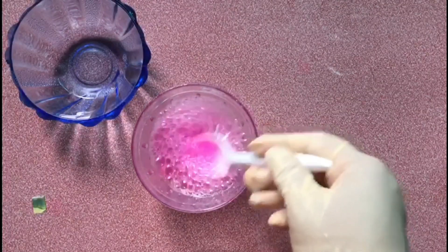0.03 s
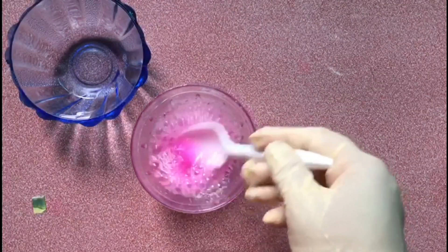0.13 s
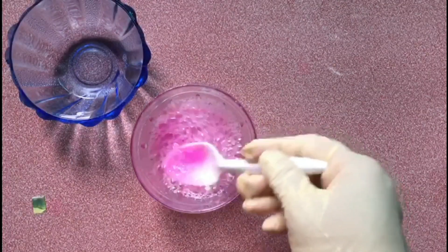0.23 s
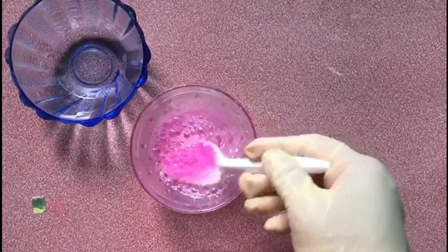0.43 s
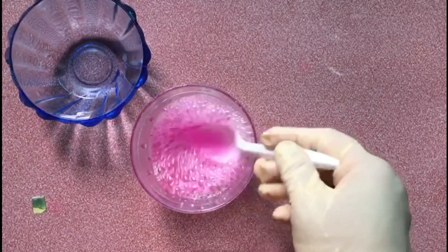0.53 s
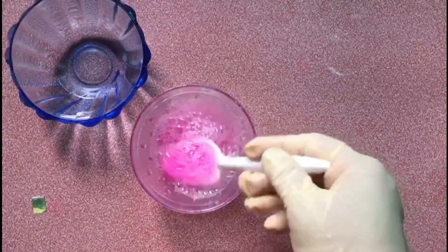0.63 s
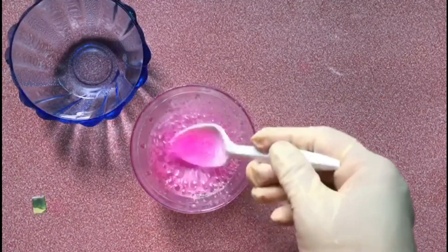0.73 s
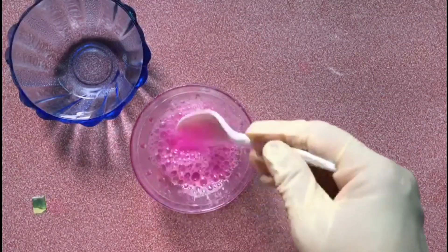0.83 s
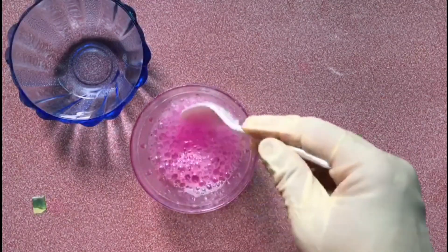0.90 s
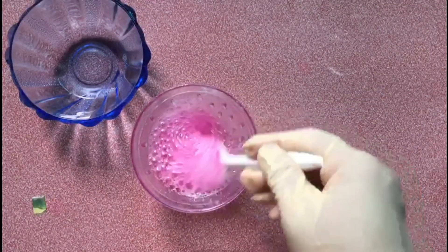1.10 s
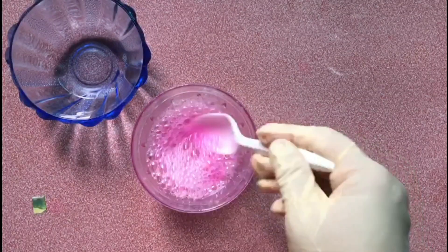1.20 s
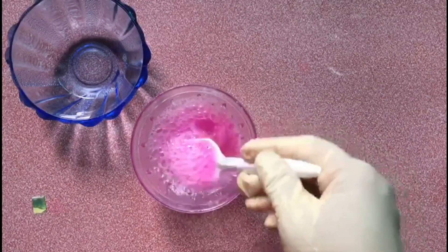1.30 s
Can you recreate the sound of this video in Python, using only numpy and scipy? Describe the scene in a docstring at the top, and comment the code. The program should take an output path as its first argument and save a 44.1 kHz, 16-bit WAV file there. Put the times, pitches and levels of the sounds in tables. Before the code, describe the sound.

A plastic spoon clacks against a small glass bowl while stirring foamy liquid, heard close in a quiet room with a faint hum. After light touches, it clacks at 0.2 seconds and hardest at 0.4, with soft table thumps. At 0.7 a tap rocks the bowl. At 1.1 another clack rings the glass briefly, followed by light ticks and faint swirling liquid.

```python
"""A quiet room, one microphone close to a small glass bowl on a table: a plastic spoon stirs foamy liquid.
From the start foam crackles over a low hum, and the spoon touches the bowl lightly. It clacks at 0.2 s
and hardest at 0.4 s, each push making the table boom. At 0.7 s a tap rocks the bowl and the glass rings
faintly. At 1.1 s a last clack rings the glass again; light ticks, blips and swirling liquid follow."""
import sys
import numpy as np
from scipy import signal
from scipy.fft import rfft, irfft
from scipy.io import wavfile

SR = 44100
rng = np.random.default_rng(int(sys.argv[2]) if len(sys.argv) > 2 else 0)


def wrap_up_sound(samples):
    """Save the sound to the file named by the first command line argument, as 16-bit audio."""
    columns = np.atleast_2d(samples).T
    # keep every value between -1 and 1, then stretch to whole-number steps
    tamed = np.clip(columns, -1, 1)
    steps = np.round(tamed * 32767).astype(np.int16)
    wavfile.write(sys.argv[1], SR, steps)


N = 59535
T = np.arange(N) / SR


def from_db(db):
    """Decibels to gain."""
    return 10 ** (np.asarray(db) / 20)


def unit_rms(x):
    """Scale to an rms of 1."""
    return x / np.sqrt(np.mean(x ** 2) + 1e-20)


def at_time(s, x):
    """Start a sound at s seconds."""
    return np.concatenate([np.zeros(max(int(s * SR), 0)), x])[:N]


def decay(t60):
    """Envelope that loses 60 dB in t60 seconds."""
    return np.exp(-np.log(1000) * T / t60)


def sine(hz):
    """A unit sine."""
    return np.sin(2 * np.pi * hz * T)


def damped(hz, swell_s):
    """A heavily damped mode that peaks at swell_s and dies quickly."""
    return sine(hz) * T / swell_s * np.exp(1 - T / swell_s)


def noise():
    """White noise."""
    return rng.standard_normal(N)


def coloured(x, spectrum):
    """Shape a signal by (frequency [Hz], gain [dB]) points, then scale to an rms of 1."""
    hz, db = np.transpose(spectrum)
    bin_hz = np.maximum(np.fft.rfftfreq(N, 1 / SR), 1)
    gain = from_db(np.interp(np.log(bin_hz), np.log(hz), db))
    return unit_rms(irfft(rfft(x) * gain, N))


def drift(hz):
    """A slow random wander below hz, with an rms of 1."""
    lowpass = signal.butter(2, hz, fs=SR, output="sos")
    return unit_rms(signal.sosfilt(lowpass, rng.standard_normal(2 * N))[N:])


# air of the quiet room: (frequency [Hz], relative level [dB])
AIR_COLOUR = [(25, -30), (55, -10), (120, 1.5), (300, -12), (700, -20), (1400, -22), (1800, -19.5),
              (2800, -23), (9000, -28), (12000, -35)]
# low hum in the room: (pitch [Hz], swell as points of (time [s], level [dB]))
HUM_TONES = [(56, [(0, -82), (0.3, -61), (0.68, -67.5), (0.79, -56), (0.92, -71), (1.1, -69), (1.28, -56)]),
             (103, [(0, -94), (0.35, -67.5), (0.65, -66), (0.85, -72.5), (1.0, -65), (1.3, -57.5)])]

def room_tone():
    """Faint hiss and two hum tones that swell and waver behind everything."""
    out = from_db(-66.5) * coloured(noise(), AIR_COLOUR)
    for hz, points in HUM_TONES:
        swell = from_db(np.interp(T, *np.transpose(points)))
        waver = 1 + 0.31 * (drift(hz=1.9) + 1j * drift(hz=7.1))   # in level and phase
        out += swell * np.real(waver * np.exp(2j * np.pi * hz * T))
    return out


# the room around the bowl: (band centre [Hz], level [dB], t60 [s])
ROOM_BANDS = [(150, -9.5, 0.39), (503.5, -5.5, 0.23), (1064, -9, 0.3), (1620, -9, .36), (2082, -15.5, 0.3),
              (3300, -11.5, 0.28), (5680, -15, 0.18), (11000, -13, 0.16)]

def reverberation(near, onset_s=0.00081, end_s=0.22):
    """The room returns a diffuse tail, each band with its own decay, cut short after end_s."""
    log_hz = np.log(np.maximum(np.fft.rfftfreq(N, 1 / SR), 1))
    log_centres = np.log([hz for hz, _, _ in ROOM_BANDS])
    window = (1 - np.exp(-T / onset_s)) * np.exp(-(T / end_s) ** 4)
    white = rfft(noise())
    tail = np.zeros(N)
    for selector, (_, db, t60) in zip(np.eye(len(ROOM_BANDS)), ROOM_BANDS):
        band = irfft(white * np.interp(log_hz, log_centres, selector), N)
        envelope = decay(t60) * window
        tail += from_db(db) * band * envelope / np.linalg.norm(envelope)
    return signal.fftconvolve(near, tail)[:N]


# foam on the liquid: (frequency [Hz], relative level [dB])
POP_COLOUR = [(300, -28.5), (1000, 14.5), (2000, -7), (3500, -3.5), (7000, -1), (12000, -46)]

def foam(pops_per_s=73, spread_db=3.5):
    """Tiny bubbles burst at random, barely audible even up close."""
    bursts = rng.random(N) < pops_per_s / SR
    strength = from_db(spread_db * np.minimum(rng.exponential(1, N), 4))
    polarity = rng.choice([-1, 1], N)
    return from_db(-83) * coloured(bursts * strength * polarity, POP_COLOUR)


# liquid swirling behind the spoon: (peak time [s], level [dB], half length [s])
STROKES = [(0.23, -60.5, .035), (0.813, -69.5, 0.047), (1.188, -58, 0.061), (1.344, -64.5, 0.037)]
# its wash: (frequency [Hz], relative level [dB])
WASH_COLOUR = [(120, -7), (270, 1.5), (520, -4), (850, -10), (1700, -6), (3000, -6.5), (6000, -15.5),
               (12000, -31.5)]

def swirls(grains_per_s=2800):
    """A soft, grainy wash swells and fades behind each stroke."""
    grains = (rng.random(N) < grains_per_s / SR) * noise()
    flow = sum(from_db(db) * np.exp(-((T - s) / half_s) ** 2) for s, db, half_s in STROKES)
    return flow * coloured(grains, WASH_COLOUR)


# short pitched blips at the bowl: (time [s], level [dB], pitch [Hz])
PITCHED_BLIPS = [(0.045, -55.5, 1840), (0.057, -45, 1860), (0.063, -46.5, 1860), (0.059, -61.5, 643),
                 (0.701, -49.5, 560), (1.132, -52.5, 395), (1.191, -66, 478), (1.308, -63.5, 964)]

def blips(swell_cycles=4):
    """Short damped tones: soft spoon taps at the start, a knock as the bowl rocks, a few liquid blips."""
    return sum(at_time(s, from_db(db) * damped(hz, swell_cycles / hz)) for s, db, hz in PITCHED_BLIPS)


# pushes on the table under the bowl:
# (time [s], level [dB], lowest mode [Hz], gain of the upper modes [dB], t60 of the lowest mode [s])
TABLE_PUSHES = [(0.221, -41, 172.7, -1, 0.24), (0.404, -35.5, 165.4, -7.5, 0.27),
                (0.712, -36.5, 156.9, 0, 0.78), (0.954, -48, 144.3, -16.5, 0.081),
                (1.134, -43, 156.3, 0.5, 0.53)]
# the table's upper modes: (ratio to the lowest mode, relative level [dB], t60 [s])
TABLE_OVERTONES = [(1.16, -6, 0.32), (1.67, -14.5, 0.35), (1.94, -23, .3), (2.34, -13.5, 0.16),
                   (3.29, -13.5, 0.1), (3.98, -23, 0.39), (4.45, -18, 0.28)]

def table_boom(rise_s=0.011, end_s=0.19):
    """The table booms under each push, swelling over a cycle or two and cut short after end_s."""
    out = np.zeros(N)
    window = (1 - np.exp(-T / rise_s)) * np.exp(-(T / end_s) ** 6)
    for s, db, hz, upper_db, lowest_t60 in TABLE_PUSHES:
        lowest = sine(hz) * decay(lowest_t60)
        upper = sum(from_db(mode_db) * sine(hz * ratio) * decay(t60)
                    for ratio, mode_db, t60 in TABLE_OVERTONES)
        out += at_time(s, from_db(db) * window * (lowest + from_db(upper_db) * upper))
    return out


# the bowl tips, then lands on the table: (time [s], level [dB])
BOWL_ROCKS = [(0.7007, -42), (0.7235, -42.5)]
# its rattle: (frequency [Hz], relative level [dB])
RATTLE_COLOUR = [(100, -34), (300, -11.5), (560, 5), (900, -2), (1600, -1), (2500, -11), (5000, -19),
                 (12000, -33.5)]

def rocking_bowl(foot_hz=377.2, foot_gain_db=8.5):
    """The bowl tips with a dull rattle and lands on its foot with a hollow knock."""
    rattle = sum(at_time(s, from_db(db) * coloured(noise(), RATTLE_COLOUR) * decay(t60=0.15))
                 for s, db in BOWL_ROCKS)
    landing_s, landing_db = BOWL_ROCKS[-1]
    knock = from_db(landing_db + foot_gain_db) * sine(foot_hz) * decay(t60=0.14)
    return rattle + at_time(landing_s, knock)


# modes of the glass bowl, one list each: (pitch [Hz]), (relative level [dB]), (free t60 [s])
BOWL_HZ = [1645, 1720, 3630, 6100, 9200]
BOWL_DB = [-2, -17, 1.5, 2, -8.5]
BOWL_T60_S = [0.13, 0.35, 0.092, 0.082, 0.1]
# rings of the glass: (time [s], level [dB], tilt above the lowest mode [dB/octave], factor on t60)
GLASS_RINGS = [(0.7003, -53.5, 5, 0.45), (1.118, -41.5, -1, 1.12)]

def glass_ring():
    """The bowl rings briefly as the spoon springs clear, damped by the liquid and the spoon."""
    out = np.zeros(N)
    for s, db, tilt, t60_factor in GLASS_RINGS:
        for hz, mode_db, t60 in zip(BOWL_HZ, BOWL_DB, BOWL_T60_S):
            gain = from_db(db + mode_db + tilt * np.log2(hz / BOWL_HZ[0]))
            out += at_time(s, gain * sine(hz) * decay(t60_factor * t60))
    return out


# light touches of the spoon, heard close: (time [s], level [dB], band centre [Hz], t60 [s])
SPOON_TOUCHES = [(0.0352, -37, 7280, 0.008), (0.035, -49, 3070, 0.02), (0.045, -55, 1860, 0.057),
                 (0.0619, -52.5, 2330, .03), (0.079, -60.5, 2770, 0.036), (0.183, -48.5, 2380, .012),
                 (0.2005, -51, 2000, 0.025), (0.2950, -44.5, 3140, 0.022), (0.2942, -55.5, 5700, 0.011),
                 (0.641, -61.5, 2410, 0.02), (0.7245, -46.5, 6000, 0.017), (0.7358, -48, 4070, 0.0098),
                 (0.7531, -34.5, 3350, 0.014), (0.98, -61.5, 2500, 0.017), (1.214, -49, 1900, 0.043),
                 (1.2525, -43.5, 3150, 0.005), (1.3087, -46, 2120, 0.033), (1.337, -49.5, 5300, 0.014),
                 (1.3415, -43.5, 2090, 0.013)]

def spoon_ticks(width_octaves=0.3):
    """Each light touch is a brief scuff in one broad resonance."""
    out = np.zeros(N)
    for s, db, hz, t60 in SPOON_TOUCHES:
        edges_hz = hz * 2 ** (np.array([-0.5, 0.5]) * width_octaves)
        resonance = signal.butter(2, edges_hz, "band", fs=SR, output="sos")
        scuff = unit_rms(signal.sosfilt(resonance, noise()))
        out += at_time(s, from_db(db) * scuff * decay(t60))
    return out


def clack(hz, swell_s):
    """The spoon's main mode builds up while it slips and is choked by the liquid."""
    return sine(hz) * T / swell_s * np.exp((1 - (T / swell_s) ** 2) / 2)


# the spoon's heavily damped modes, in three groups from low to high:
# (pitch [Hz], relative level [dB], swell [s])
SPOON_BITE = [(1050, -16, 0.0012), (1400, -11, 0.0011), (2433, -2, 0.00089), (3110, 0.5, 0.00057)]
SPOON_EDGE = [(3750, -0.92, 0.0008), (4242, -0.89, 0.0006)]
SPOON_TREBLE = [(5290, 3.5, 0.00056), (6950, -2, 0.00041), (8374, -7.5, 0.00062), (9480, -8.5, 0.0004)]
# crack of plastic meeting glass: (frequency [Hz], relative level [dB])
CONTACT_COLOUR = [(400, -17.5), (1100, -5), (2800, 5.5), (6000, -7), (9500, -7), (12000, -22.5)]
# spoon on bowl, close to the microphone: (time [s], clack [dB], bite [dB], edge [dB], treble [dB],
# crack [dB], clack pitch [Hz], clack swell [s], knock [dB])
SPOON_TAPS = [(0.0143, -41, -38.5, -44, -46, -58, 1770, 0.002, -51),
              (0.0162, -39, -39.5, -62, -63, -68, 1920, 0.002, -80),
              (0.2185, -27.5, -23, -37.5, -34.5, -32, 1903, 0.0024, -53),
              (0.4020, -13, -38.5, -25, -32, -25, 1900, .0016, -49),
              (0.7003, -31.5, -34.5, -40.5, -46.5, -34, 1770, 0.0011, -54),
              (0.7020, -41, -66, -35, -59, -32, 1760, 0.0011, -48),
              (1.1187, -19, -23.5, -33.5, -33.5, -27.5, 1905, 0.0011, -57.5)]

def spoon_taps(low_cut_hz=1250):
    """Each tap: a crack, spoon modes mixed by the point of contact, and the filled bowl's hollow knock."""
    out = np.zeros(N)
    bite, edge, treble = (sum(from_db(db) * damped(hz, swell_s) for hz, db, swell_s in modes)
                          for modes in (SPOON_BITE, SPOON_EDGE, SPOON_TREBLE))
    # the small spoon radiates little bass
    radiation = signal.butter(3, low_cut_hz, "high", fs=SR, output="sos")
    for s, clack_db, bite_db, edge_db, treble_db, crack_db, hz, swell_s, knock_db in SPOON_TAPS:
        crack = from_db(crack_db) * coloured(noise(), CONTACT_COLOUR) * decay(t60=0.0094)
        spoon = from_db(clack_db) * clack(hz, swell_s)
        spoon += from_db(bite_db) * bite + from_db(edge_db) * edge + from_db(treble_db) * treble
        knock = from_db(knock_db) * damped(hz=394.7, swell_s=0.0048)
        out += at_time(s, crack + signal.sosfilt(radiation, spoon) + knock)
    return out


def scene():
    """In mono: spoon, bowl and liquid up close with their reverberation, over table boom and room tone."""
    near = spoon_taps() + glass_ring() + spoon_ticks() + rocking_bowl() + blips() + swirls() + foam()
    return (near + reverberation(near) + table_boom() + room_tone())[None]


def record(dry, cutoff_hz=11900):
    """The microphone signal, with the top cut steeply."""
    lowpass = signal.ellip(10, 0.2, 70, cutoff_hz, fs=SR, output="sos")
    return signal.sosfilt(lowpass, dry)


dry = scene()
out = record(dry)
wrap_up_sound(out)
```